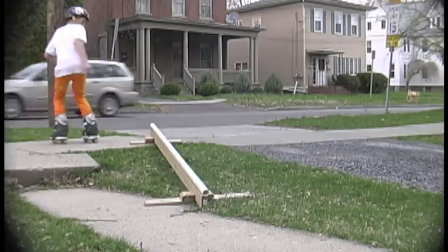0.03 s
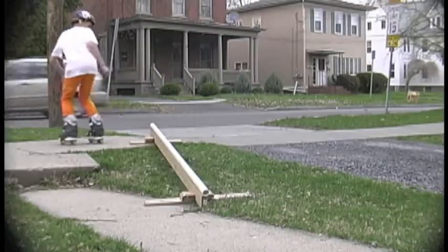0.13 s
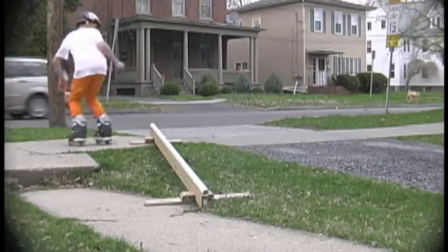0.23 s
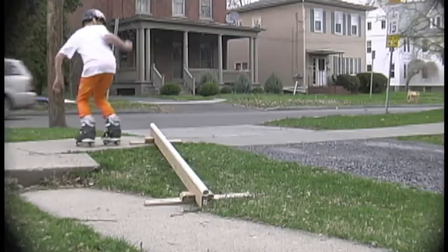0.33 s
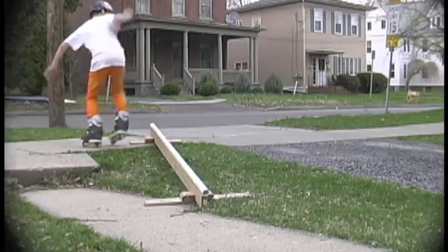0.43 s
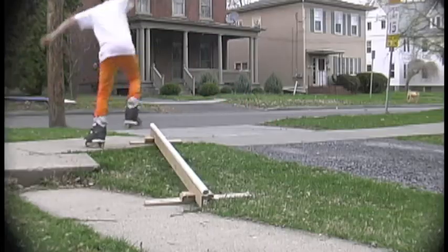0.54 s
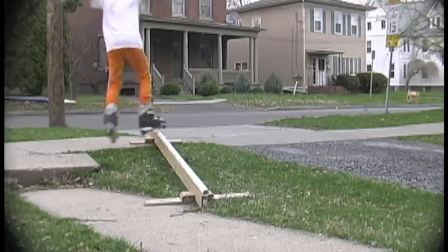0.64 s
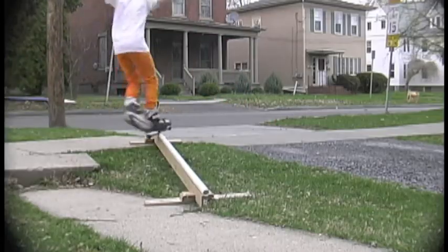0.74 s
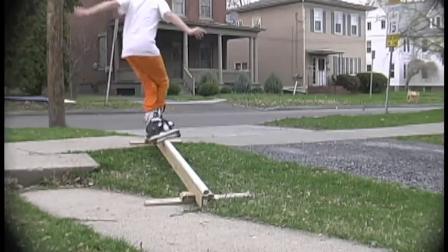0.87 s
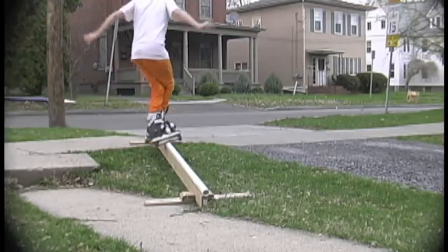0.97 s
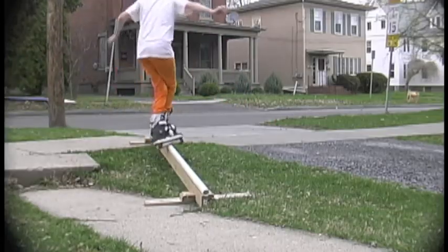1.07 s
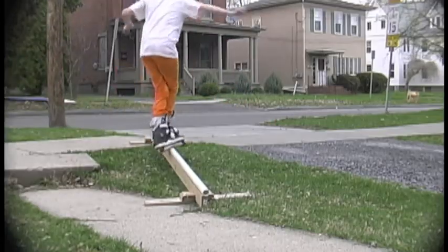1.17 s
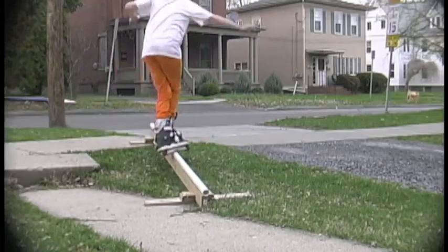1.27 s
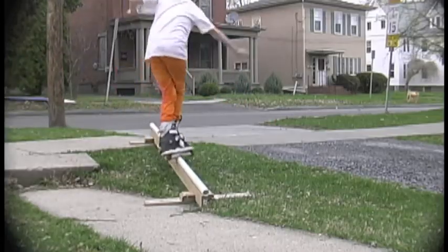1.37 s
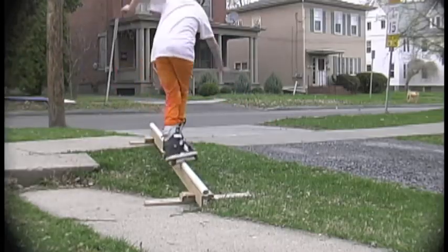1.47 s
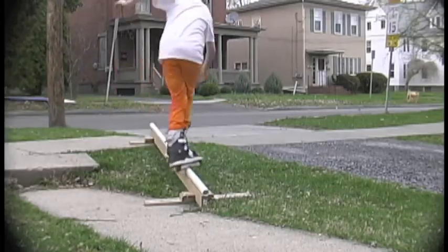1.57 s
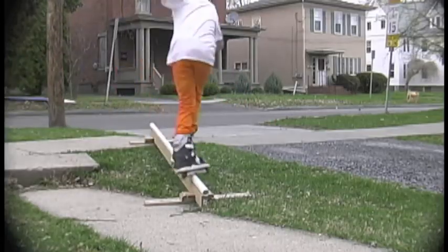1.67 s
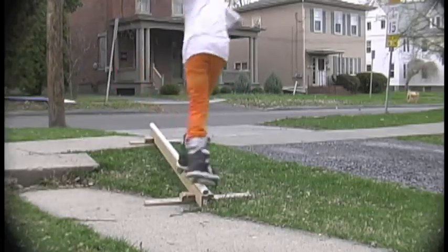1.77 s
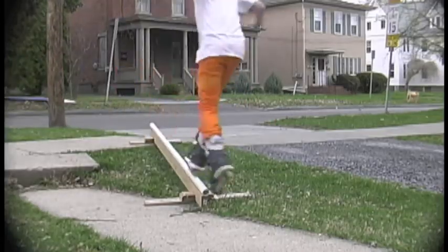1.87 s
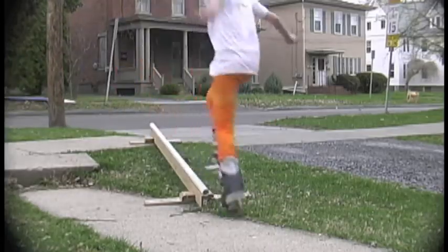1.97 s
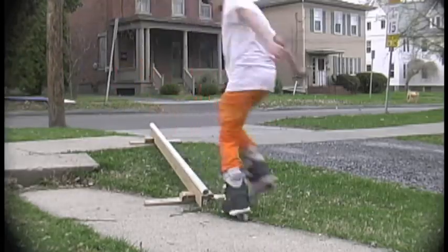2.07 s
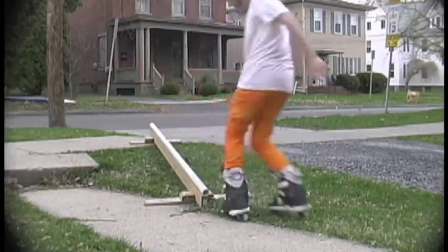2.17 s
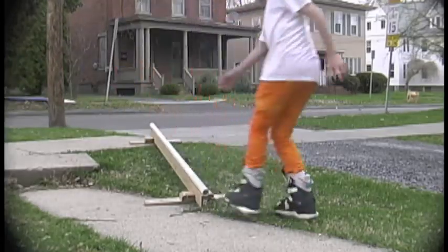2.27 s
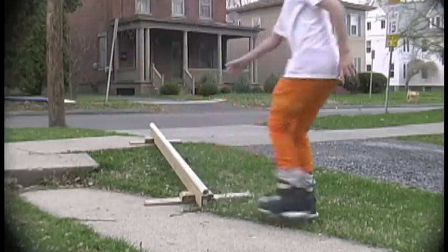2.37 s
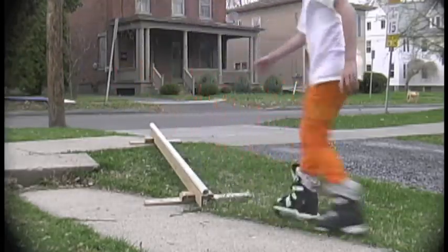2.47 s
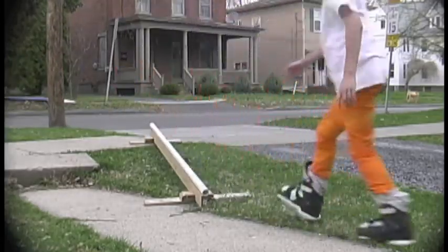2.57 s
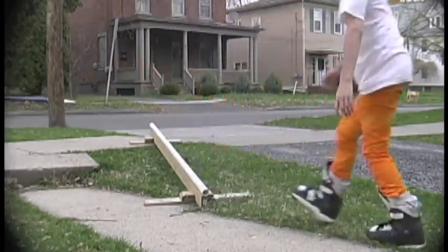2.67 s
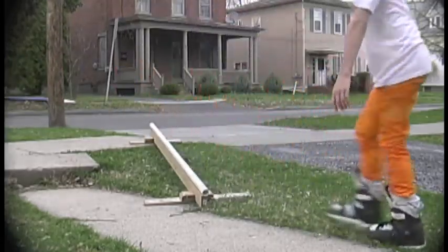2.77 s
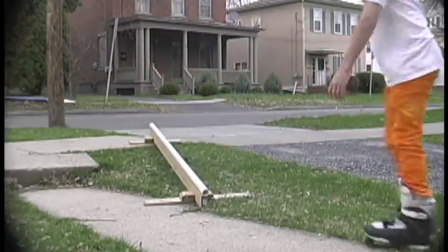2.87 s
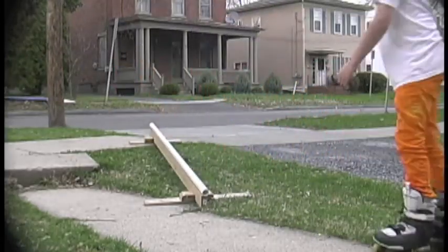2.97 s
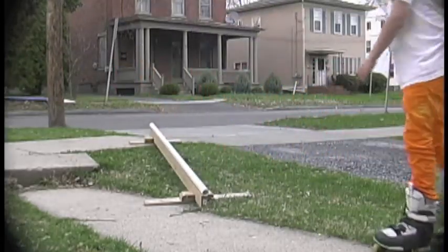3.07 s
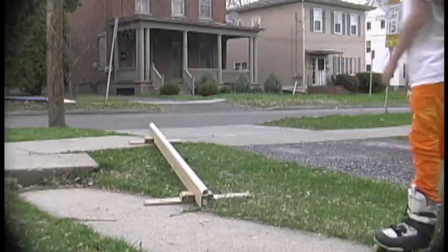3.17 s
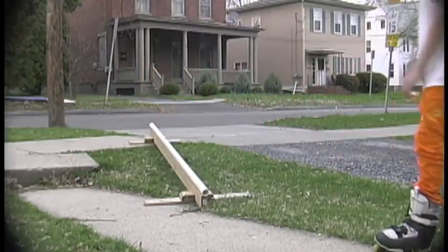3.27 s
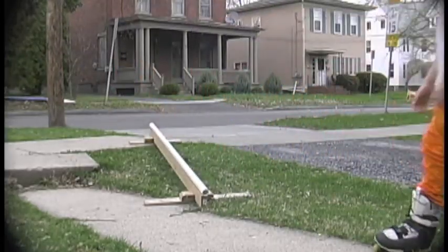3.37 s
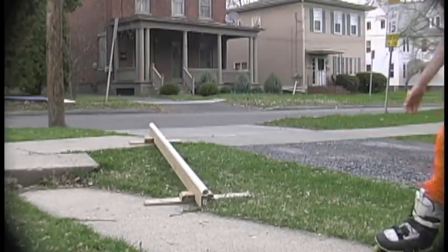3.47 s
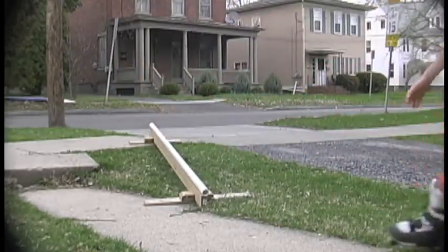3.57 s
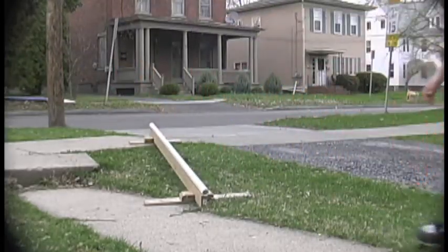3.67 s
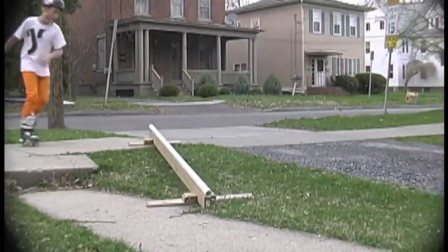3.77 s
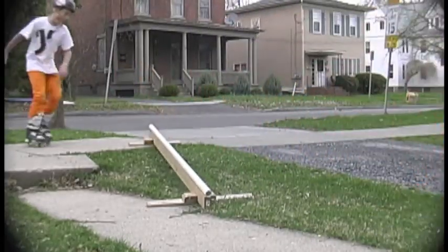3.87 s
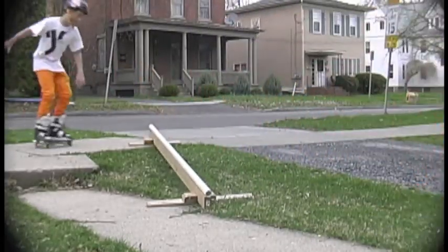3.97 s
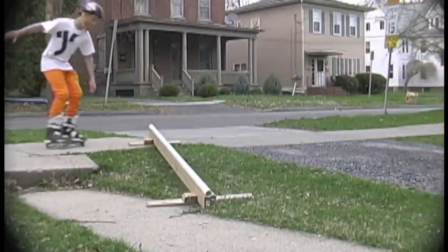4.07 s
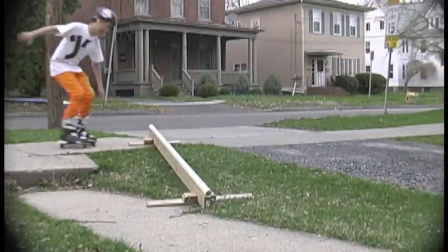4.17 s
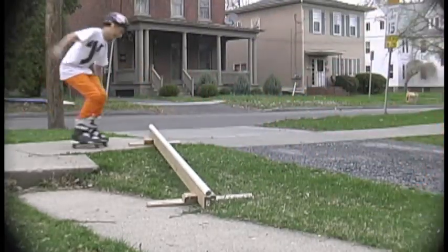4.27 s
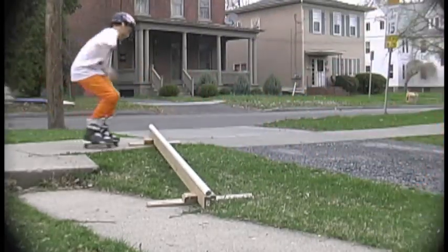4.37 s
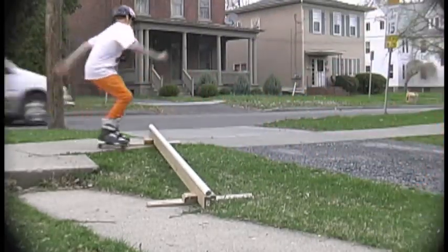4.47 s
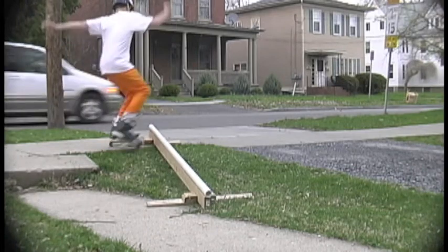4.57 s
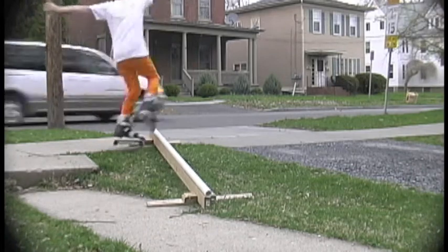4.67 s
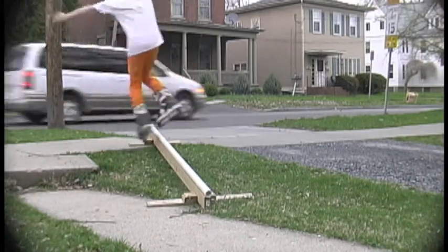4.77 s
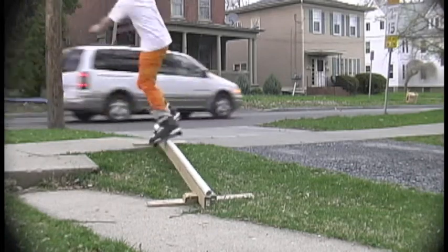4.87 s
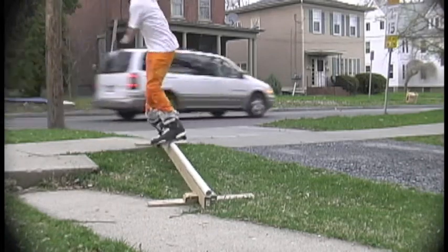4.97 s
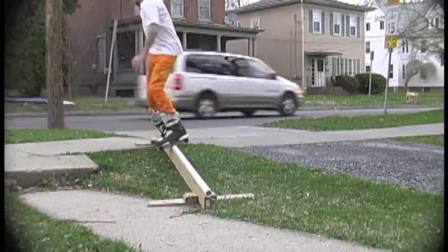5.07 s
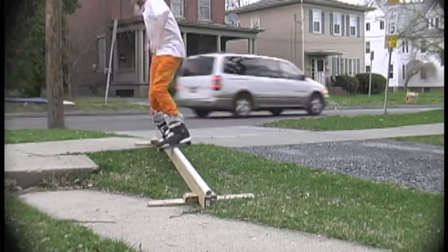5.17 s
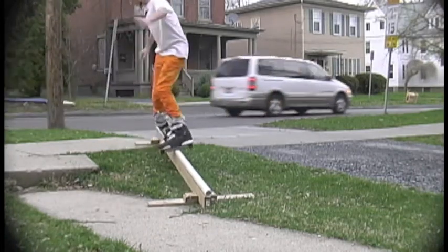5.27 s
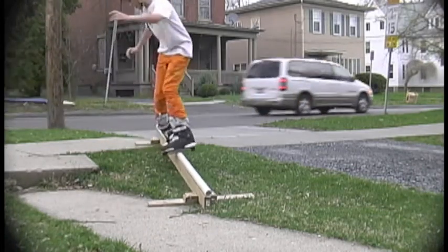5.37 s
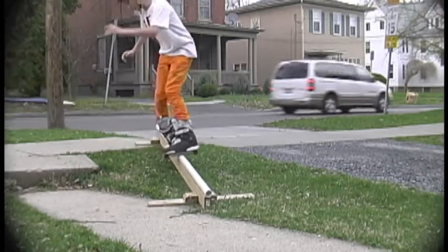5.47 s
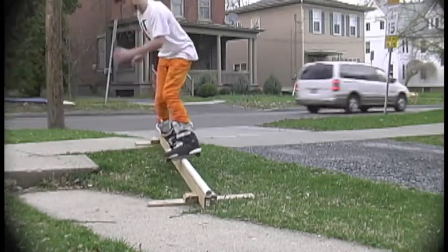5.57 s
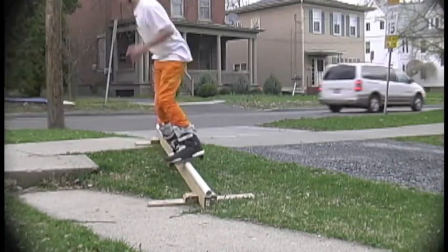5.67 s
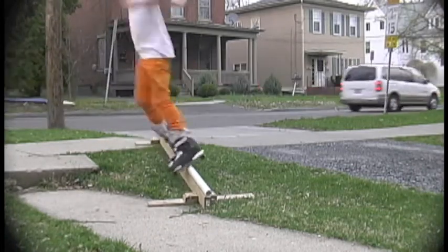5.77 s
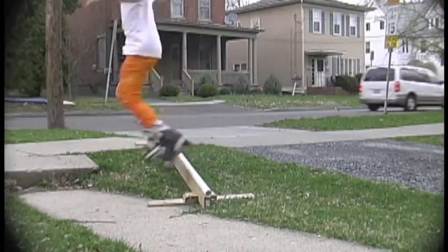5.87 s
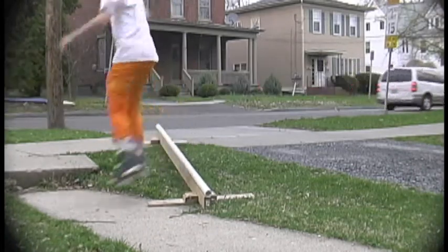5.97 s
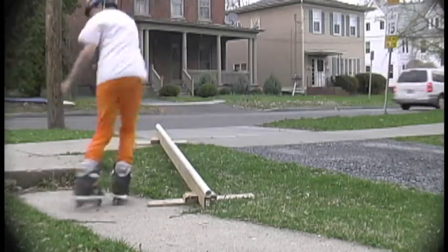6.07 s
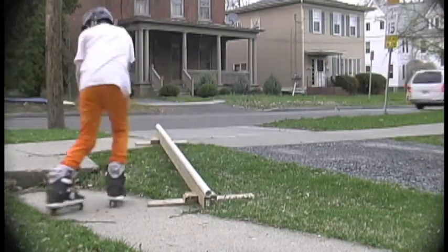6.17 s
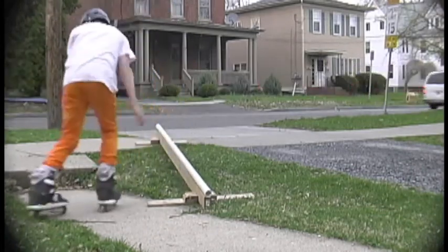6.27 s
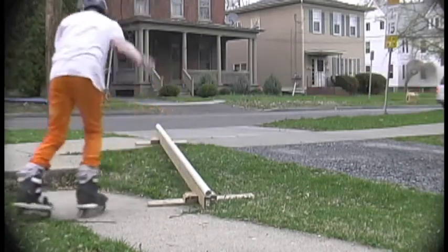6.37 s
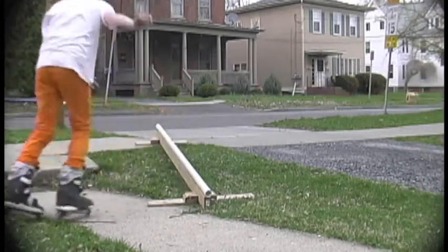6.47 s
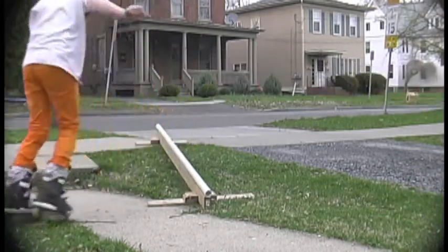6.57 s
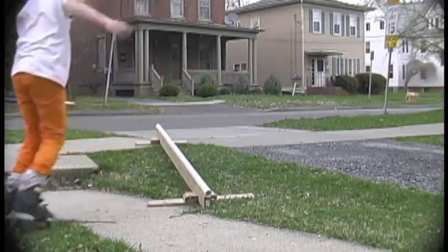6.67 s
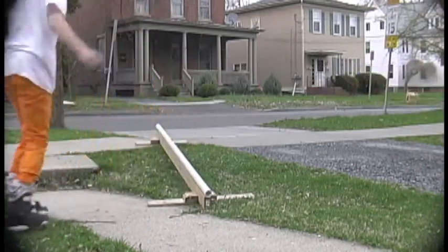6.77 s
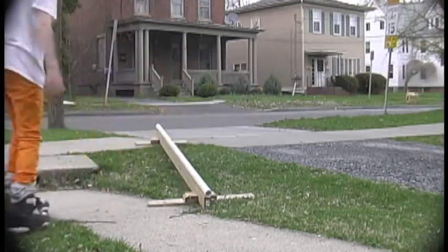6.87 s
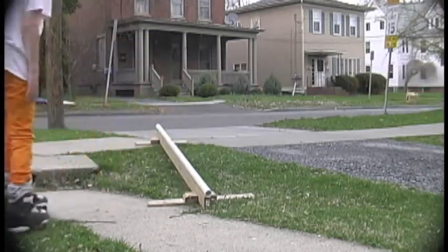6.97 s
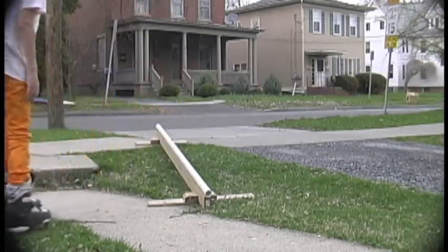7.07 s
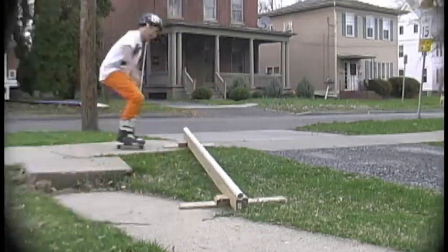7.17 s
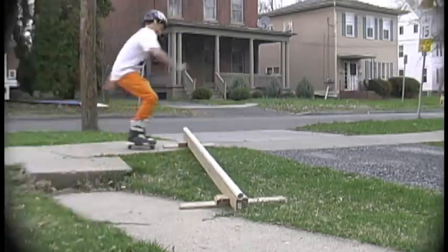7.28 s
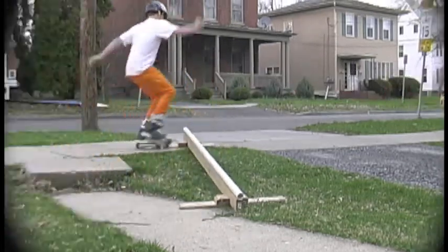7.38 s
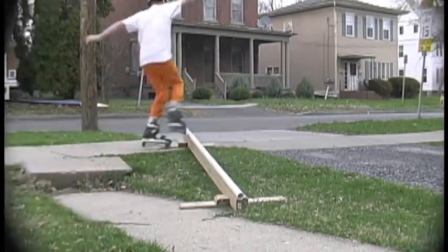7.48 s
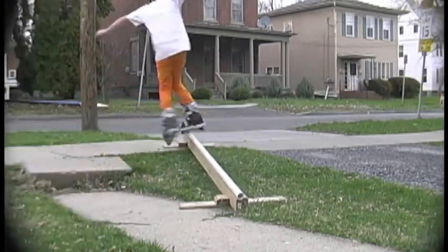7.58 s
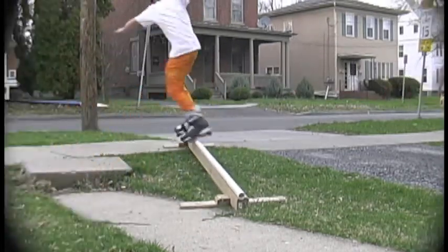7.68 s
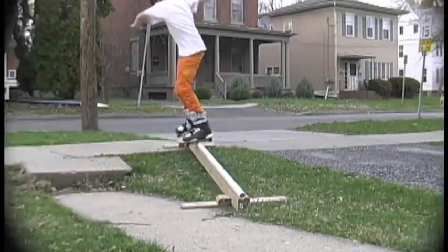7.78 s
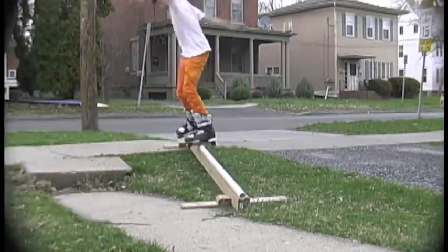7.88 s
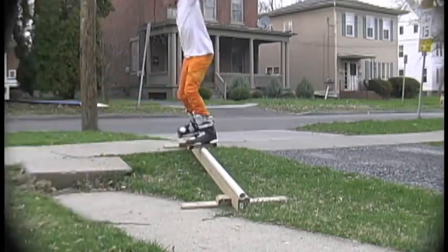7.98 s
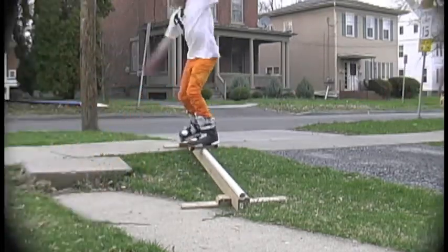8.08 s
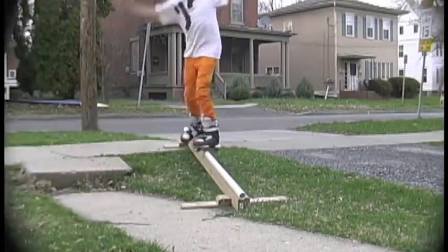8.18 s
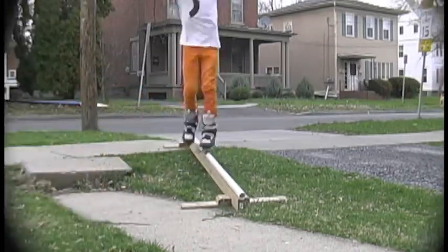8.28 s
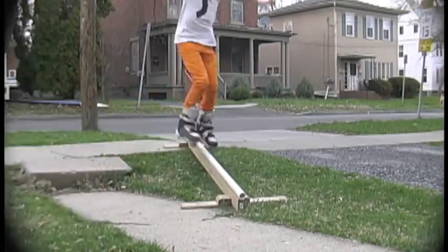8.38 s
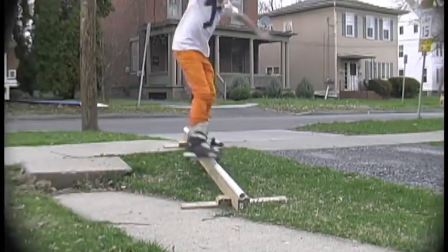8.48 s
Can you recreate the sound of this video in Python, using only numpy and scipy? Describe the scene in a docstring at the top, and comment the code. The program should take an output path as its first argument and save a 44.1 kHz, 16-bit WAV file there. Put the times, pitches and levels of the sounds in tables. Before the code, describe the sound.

Outdoors on a residential street, inline skates hit a wooden rail with sharp plastic and woody clacks, slide quietly, then land with a hard crack and gritty wheel roll. Three attempts are joined by brief dips in sound, the last ending on the rail. Low traffic rumble, tyre wash and faint chirping birds sit behind. Close stereo microphone.

```python
"""Inline skates knock, land on a wooden rail, grind along it and drop onto pavement in a residential street.
Each knock is a noise crack ringing plastic and wood modes, with a soft low thump and a short noise tail.
Wheels, grit and scuffs are grainy banded noise. Behind them lie traffic in banded noise, engine sines and
faint birds in swept sines. An opening snippet runs into three passages, with fades around each join."""
import sys
import numpy as np
from scipy import signal
from scipy.io import wavfile
from scipy.ndimage import uniform_filter1d

SR = 44100
rng = np.random.default_rng(int(sys.argv[2]) if len(sys.argv) > 2 else 0)


def generate_wav(sig):
    """Save sig (samples, or channels by samples) to the path in sys.argv[1] as 16-bit PCM at SR."""
    pcm = np.round(np.clip(np.atleast_2d(sig).T, -1, 1) * 32767).astype(np.int16)
    wavfile.write(sys.argv[1], SR, pcm)


def volts_from_decibels(level):
    """Turn decibel levels (scalar or array-like) into linear amplitude factors."""
    exponent = np.asarray(level, float) / 20
    return 10 ** exponent


N = 375732


def rms_one(x):
    """Scale to rms 1."""
    return x / np.sqrt(np.mean(x ** 2) + 1e-20)


def in_time(rows):
    """Draw each column of a timed table as a curve over every sample."""
    seconds, *columns = np.transpose(rows)
    return [np.interp(np.arange(N) / SR, seconds, column) for column in columns]


# Joins that open the three passages.
# Each row: time in seconds, fade out before it in seconds, fade in after it in seconds.
JOINS = [(0.068, 0.096, 0.069), (3.767, 0.11, 0.11), (7.241, 0.074, 0.1)]


def passage_number():
    """Passage (0 to 2) that each sample belongs to; the opening snippet counts with the first."""
    return np.searchsorted([join[0] for join in JOINS[1:]], np.arange(N) / SR)


def by_passage(tables):
    """Let each passage read its own curves, so values jump at the joins."""
    return [np.choose(passage_number(), column) for column in zip(*map(in_time, tables))]


def at_hz(points, hz):
    """Read a table at a frequency, on a log axis."""
    points = np.array(points)
    return np.interp(np.log(hz), np.log(points[:, 0]), points[:, 1])


def drift(rate_hz):
    """Slow random wander of rms 1: noise through two equal one-pole lowpasses."""
    pole = np.exp(-80 * np.pi * rate_hz / SR)   # runs at a fortieth of the sample rate
    slow = signal.lfilter([1], [1, -2 * pole, pole ** 2], rng.standard_normal(N // 40 + 2002))
    slow = rms_one(slow[2000:])
    return np.interp(np.arange(N) / 40, np.arange(len(slow)), slow)


def ring(force, hz, t60):
    """Damped resonance: a unit click rings a sine that starts at height 1; t60 is at least 3 ms."""
    decay = volts_from_decibels(-60 / (max(t60, .003) * SR))
    turn = 2 * np.pi * hz / SR
    return signal.lfilter([0, np.sin(turn)], [1, -2 * decay * np.cos(turn), decay ** 2], force + 1e-18)


def panned(pan_db):
    """Left and right gains; pan_db is left over right."""
    return volts_from_decibels(np.multiply.outer([.5, -.5], pan_db))


def banded(spectrum, likeness, patchy_db, grain_db=0., grains_per_s=3000.):
    """Stereo noise of rms 1 in flickering half-octave bands; random grains make it gritty."""
    white = rng.standard_normal((2, 2, N))
    grains = (rng.random(N) < grains_per_s / SR) * rng.exponential(1, N)
    grain_swell = np.minimum(uniform_filter1d(grains, size=20) * 8, 3)
    white = white * volts_from_decibels(grain_db * grain_swell)
    lowest, highest = spectrum[0][0], spectrum[-1][0]
    edges = lowest * 2 ** np.arange(0, np.log2(highest / lowest) + .5, .5)
    out, together = 0, drift(10.8)
    for k, (low, high) in enumerate(zip(edges, np.minimum(edges[1:], .45 * SR))):
        band = signal.butter(2, [low, high], "band", fs=SR, output="sos")
        mid, side = signal.sosfilt(band, white[k % 2])
        hz = np.sqrt(low * high)
        alike = np.clip(at_hz(likeness, hz), 0, .999)
        flicker_db = patchy_db * (0.79 * together + drift(18.0))
        gain = volts_from_decibels(at_hz(spectrum, hz) + flicker_db)
        out = out + gain * (np.sqrt(1 + alike) * mid + np.sqrt(1 - alike) * side * [[1], [-1]])
    return rms_one(out)


# Passing traffic, one list per passage.
# Each row: time in seconds, tyre roar in dB, low rumble in dB, tyre pan in dB (left over right).
PASSING = [
    [(0.16, -44, -0.5, 2.5), (1.0, -43.5, 2.5, 2.5), (1.9, -44, 0, 3.5), (2.7, -45, -5, 0),
     (2.95, -45, -4, -2), (3.62, -48.5, -6.5, 0.5)],
    [(3.9, -37, 3.5, 2), (4.5, -38.5, 3.5, 2.5), (5.0, -36.5, 0, 0.5), (5.35, -38.5, -4, -0.5),
     (5.9, -43, -5, -4), (6.35, -43, -4, 0.5), (6.7, -44, -4, -0.5), (7.1, -49, -12.5, -3.5)],
    [(7.38, -56, -3.5, 5), (7.7, -48.5, 0.5, 0.5), (8.52, -54, -1.5, -1)],
]
# Street bed where the low rumble column is 0, one row per passage.
# Each row: road rumble in dB, car-body boom in dB, hum in dB (moves with the boom), wind in dB, wind rise in dB/s.
STREET_BED = [(-40.5, -48, -49.5, -54, -1.5), (-40.5, -47.5, -45, -59.5, 3.5), (-38, -54, -65, -45, 8)]
# Noise colours. Each row: frequency in Hz, relative density in dB per Hz.
RUMBLE_COLOUR = [(26, -24), (45, -9.5), (92, -2), (260, -18.5), (340, -47), (570, -120)]
BOOM_COLOUR = [(100, -23), (170, -1), (226, -4), (280, 4.5), (492, -25.5), (560, -22), (730, -43),
               (1230, -120)]
WIND_COLOUR = [(18, 3.5), (32, -7), (60, -9.5), (100, -11)]
TYRE_COLOURS = [
    [(290, -51), (500, -5), (661, -10), (833, -2), (1350, 1), (1980, -7.5), (3890, -12.5), (5000, -6),
     (6500, -49), (11000, -120)],
    [(290, -2), (500, -7), (578, -21), (764, 6), (1020, -1.5), (1220, 2), (2400, -12.5), (5000, -10),
     (6500, -34), (11000, -120)],
    [(290, -42), (500, -7), (612, -12), (749, -5), (1020, -9), (1460, -8.5), (5000, -20.5), (6500, -23),
     (11000, -120)],
]   # one list per passage
# Stereo width of the tyre roar. Each row: frequency in Hz, left-right likeness (1 is mono).
TYRE_LIKENESS = [(60, 0.96), (150, 0.93), (380, 0.078), (950, 0.2), (2380, 0.4), (5980, 0.23),
                 (15000, 0.91)]
RUMBLE_FOLLOWS, BOOM_FOLLOWS = 0.64, 1.41   # dB for each dB of low rumble
HUM_HZ, HUM_WIDTH_HZ = 227.3, 14


def traffic():
    """Low road rumble, boom of car bodies, a narrow hum, the roar of tyres passing and light wind."""
    tyre_db, lows_db, pan_db = by_passage(PASSING)
    passage = passage_number()
    rumble_db, boom_db, hum_db, wind_db, wind_rise = np.transpose(STREET_BED)[:, passage]
    rumble = banded(RUMBLE_COLOUR, [(50, 1.0), (250, 0.79)], patchy_db=1.0)
    rumble = volts_from_decibels(rumble_db + RUMBLE_FOLLOWS * lows_db) * rumble
    boom = volts_from_decibels(boom_db) * banded(BOOM_COLOUR, [(200, 1.0), (500, 0.78)], patchy_db=1.0)
    hum_t60 = np.log(1000) / (np.pi * HUM_WIDTH_HZ)
    boom += volts_from_decibels(hum_db) * rms_one(ring(rng.standard_normal(N), HUM_HZ, hum_t60))
    since_join = np.arange(N) / SR - np.transpose(JOINS)[0][passage]
    wind_db = wind_db + wind_rise * since_join + 2.0 * drift(4.1)
    wind = volts_from_decibels(wind_db) * banded(WIND_COLOUR, [(20, 0.57), (100, 0.27)], patchy_db=3.0)
    tyres = [banded(colour, TYRE_LIKENESS, patchy_db=1.04) for colour in TYRE_COLOURS]
    tyres = volts_from_decibels(tyre_db) * panned(pan_db) * np.choose(passage, tyres)
    return rumble + volts_from_decibels(BOOM_FOLLOWS * lows_db) * boom + wind + tyres


# Motor note of the opening snippet, dying away with its fade. Each row: frequency in Hz, peak level in dB.
MOTOR_NOTE = [(80, -16.5), (167, -24.5)]
# Levels are rms at time zero.
IDLE_HZ, IDLE_DB, IDLE_FADE_DB_PER_S = 41, -38.5, 1.5
DRONE_HZ, DRONE_DB, DRONE_RISE_DB_PER_S = 62.8, -51, 2.0
# The idle swells and sinks, less and less: period, first crest, depth, time constant.
THROB_S, THROB_TOP_S, THROB_DEPTH, THROB_DIES_S = .93, 0.36, 0.99, 1.7


def engines():
    """Sines: an idling firing tone under a drone in the first passage, a motor note before it."""
    t = np.arange(N) / SR
    throb_depth = THROB_DEPTH * np.exp(-t / THROB_DIES_S)
    throb = 1 + throb_depth * np.cos(2 * np.pi * (t - THROB_TOP_S) / THROB_S)
    idle_db = IDLE_DB - IDLE_FADE_DB_PER_S * t + 0.57 * drift(3)
    idle = throb * volts_from_decibels(idle_db) * np.sin(2 * np.pi * IDLE_HZ * t)
    drone_db = DRONE_DB + DRONE_RISE_DB_PER_S * t + .9 * drift(5.2)
    drone = volts_from_decibels(drone_db) * np.sin(2 * np.pi * np.cumsum(DRONE_HZ + 0.93 * drift(2.54)) / SR)
    opening = sum(volts_from_decibels(db) * np.sin(2 * np.pi * (hz * t + rng.random())) for hz, db in MOTOR_NOTE)
    first_join, second_join = JOINS[0][0], JOINS[1][0]
    running = (t > first_join) * (t < second_join)
    return np.sqrt(2) * (idle + drone) * running + opening * (t < first_join)


# Far chirps.
# Each row: start in seconds, length in seconds, first Hz, last Hz, level in dB before the bird mix.
CHIRPS = [(0.23, 0.025, 4800, 5120, -41), (0.888, 0.022, 3200, 3450, -39),
          (1.319, 0.025, 4700, 5000, -45.5), (1.421, 0.031, 4800, 5160, -45.5),
          (2.745, 0.06, 4550, 3930, -47), (3.323, 0.043, 4700, 5030, -50), (3.36, 0.042, 3870, 4530, -48),
          (3.976, 0.033, 3900, 4600, -39.5), (4.582, 0.039, 4960, 5100, -38),
          (5.849, 0.057, 4560, 3790, -45), (5.917, 0.036, 3600, 2800, -45), (6.508, 0.018, 4950, 4930, -42),
          (7.3, 0.074, 3470, 3450, -51.5), (7.471, 0.012, 5180, 4970, -42),
          (7.67, 0.036, 4400, 5300, -43.5), (8.125, 0.06, 4700, 4500, -55), (8.195, 0.034, 3520, 3570, -60)]
# Bouts of twitter from a flock.
# Each row: middle in seconds, half length in seconds, level in dB before the bird mix.
TWITTER = [(.25, 0.24, -52), (2.8, .07, -57), (3.383, .06, -53.5), (3.513, .08, -59), (4.2, .4, -61.5),
           (6.45, 0.26, -61.5), (7.5, 0.4, -57)]


def birds():
    """Quick raspy sine sweeps over a flock's twitter, blurred by echoes off the houses."""
    out, rasp_hz = np.zeros(N + SR), 135. * drift(120)
    for start_s, length, from_hz, to_hz, db in CHIRPS:
        part, start = np.linspace(0, 1, int(length * SR)), int(start_s * SR)
        during = slice(start, start + len(part))
        hz = from_hz + (to_hz - from_hz) * part + rasp_hz[during]
        out[during] += volts_from_decibels(db) * np.sin(np.pi * part) * np.sin(2 * np.pi * np.cumsum(hz) / SR)
    out, t = out[:N], np.arange(N) / SR
    flock = sum(volts_from_decibels(db) * np.exp(-((t - middle) / half) ** 2) for middle, half, db in TWITTER)
    for voice_hz in (3450, 4300, 4700, 5100):
        singing = np.clip(drift(35), 0, 1.5)
        hz = voice_hz + 300. * drift(40) + rasp_hz
        out = out + flock * singing * np.sin(2 * np.pi * np.cumsum(hz) / SR)
    lag = np.arange(SR // 4)
    echoes = rng.standard_normal((2, len(lag))) * volts_from_decibels(-25 - 60 * lag / (.3 * SR))   # 60 dB in 0.3 s
    return .7 * out + signal.fftconvolve(out[None], echoes, axes=1)[:, :N]


# Times on the rail. Each row: start in seconds, end in seconds.
RAIL_TIMES = [(.74, 2.0), (4.89, 5.98), (7.65, 8.52)]


def on_rail(s):
    """True while the skater is on the rail."""
    return np.searchsorted(np.ravel(RAIL_TIMES), s) % 2 == 1


# Ringing of boot shell and frame; decays under 3 ms are held at 3 ms.
# Each row: frequency in Hz, level in dB re the knock, t60 in seconds. Pebbles borrow only the frequencies.
BOOT_MODES = [(1870, -20, 0.015), (2406, -12.5, 0.012), (2800, -16, 0.0071), (3450, -1, 0.0058),
              (4220, 4, 0.0034), (4800, -10.5, 0.0077), (5420, 4.5, 0.0027), (6440, 5.5, 0.0023),
              (7580, 4, 0.0047), (8600, -1.5, 0.0067), (9700, -36.5, 0.0047), (13300, -10, 0.0049)]


def pebbles(level_db, per_s):
    """Specks of grit under the wheels tick one boot mode each, in step with the rolling."""
    size = volts_from_decibels(5 * np.minimum(rng.exponential(1, N), 2))
    clicks = (rng.random(N) < per_s / SR) * size
    dealt = rng.integers(1, len(BOOT_MODES) - 2, N)
    ticks = sum(ring(clicks * (dealt == k), hz, 22 / hz) for k, (hz, _, _) in enumerate(BOOT_MODES))
    return volts_from_decibels(level_db) * ticks


# Wheels and soles rubbing, one list per passage. Each row: time in seconds, rolling level in dB.
ROLLING_LEVEL = [
    [(0.16, -43), (0.44, -48), (0.6, -55.5), (0.8, -52.5), (1.3, -53), (1.78, -51.5), (2.09, -44),
     (2.17, -40), (2.45, -53), (2.72, -49.5), (3.2, -55.5), (3.45, -54), (3.65, -53.5)],
    [(3.85, -51.5), (4.45, -48), (4.63, -43), (4.9, -47.5), (5.05, -40), (5.44, -49), (5.65, -53),
     (6.07, -57.5), (6.2, -38.5), (6.7, -45), (6.86, -60), (7.1, -61.5)],
    [(7.3, -47.5), (7.6, -49), (7.7, -63), (7.8, -42), (7.93, -56.5), (8.13, -62), (8.21, -50), (8.36, -64)],
]
# Wheels dragged sideways.
# Each row: start in seconds, end in seconds, level in dB at the start, level in dB at the end.
SIDE_SCUFFS = [(2.504, 2.575, -35.5, -38), (2.562, 2.705, -33.5, -43.5), (2.85, 2.997, -44, -43),
               (5.785, 5.872, -50, -41), (8.18, 8.254, -50, -43)]
# Noise colours. Each row: frequency in Hz, relative density in dB per Hz.
ROLLING_COLOUR = [(1060, -16), (1800, -2), (2830, -3), (3190, -0.5), (5010, -6), (5730, 3), (9000, -12.5),
                  (11700, -44), (19800, -120)]
GRIT_COLOUR = [(2940, -57), (5000, 7), (7270, -20), (8120, 4), (11500, 0.5), (15100, -9), (16300, -22),
               (16500, -65)]
SCUFF_COLOUR = [(530, -38), (900, -18), (1220, -5), (2120, -1.5), (2500, -11.5), (3640, -5), (8050, -10),
                (13400, -20), (16000, -15)]
GRIT_DB, GRIT_RAIL_DB = -7.5, -11.5   # grit re rolling, on concrete and on the smoother rail


def skates():
    """Wheels over rough concrete and soles over wood: grainy noise, finer grit on top, sideways scuffs."""
    rolling_db, = by_passage(ROLLING_LEVEL)
    t, drag = np.arange(N) / SR, np.zeros(N)
    grit_db = rolling_db + np.where(on_rail(t), GRIT_RAIL_DB, GRIT_DB)
    rolling = banded(ROLLING_COLOUR, [(2000, .7), (9000, .8)], patchy_db=2.5, grain_db=5.5, grains_per_s=400.)
    grit = banded(GRIT_COLOUR, [(5000, .7), (16000, .5)], patchy_db=1.5, grain_db=3.0, grains_per_s=400.)
    ticks = pebbles(rolling_db, per_s=140)
    for start, end, start_db, end_db in SIDE_SCUFFS:
        edge = np.clip(np.minimum((t - start) / .008, (end - t) / 0.027), 0, 1)
        drag += edge * volts_from_decibels(np.interp(t, [start, end], [start_db, end_db]))
    scuff = banded(SCUFF_COLOUR, [(1000, .7), (16000, .7)], patchy_db=2.0, grain_db=5.0, grains_per_s=500.)
    return volts_from_decibels(rolling_db) * rolling + volts_from_decibels(grit_db) * grit + drag * scuff + ticks


# Knocks. Each row: time in seconds, strength in dB, favoured frequency in Hz, tail in dB re strength.
BLOWS = [(0.0775, -2.5, 3660, -31.5), (0.1394, -25, 3200, -18), (0.5167, -22.5, 3030, -19),
         (0.568, -31, 5020, -23), (0.634, -30.5, 5300, -33), (0.7458, -16.5, 2310, -21.5),
         (0.7661, -9, 3400, -20.5), (0.778, -23, 3000, -24), (0.9067, -10, 5300, -10),
         (0.9169, -10.5, 2860, -35), (0.9376, -21, 2810, -32), (0.967, -17, 2810, -25),
         (0.991, -28, 2830, -24), (1.02, -27.5, 2830, -15), (1.465, -25.5, 4670, -26),
         (1.8166, -32, 4300, -15), (1.8893, -23, 4300, -22), (1.9379, -24.5, 5400, -14),
         (2.025, -13.5, 2780, -28), (2.0858, 1.5, 4000, -28), (2.0961, -9.5, 4130, -18.5),
         (2.154, -21, 7000, -30), (2.1612, -22, 7370, -39), (2.1904, -26, 4040, -24),
         (2.1960, -14.5, 4000, -26), (2.208, -20, 1740, -15), (2.985, -16.5, 5870, -16),
         (2.9914, -5, 2030, -41), (4.058, -11, 3360, -22.5), (4.0734, -8.5, 2600, -25),
         (4.207, -13, 2950, -26), (4.5152, -25, 3300, -24), (4.5547, -10.5, 5150, -20),
         (4.8977, -1, 6050, -18.5), (4.93, -10.5, 1630, -13.5), (5.0135, -11.5, 5500, -18),
         (5.0198, -5, 4080, -22), (5.0426, -6.5, 2500, -21.5), (5.1155, -18.5, 3440, -18),
         (5.967, -27, 3800, -19), (6.0899, -1.5, 5100, -23.5), (6.1068, 1, 5070, -21),
         (6.1275, -1.5, 5070, -20.5), (6.2038, -6, 3070, -31), (6.648, -24, 3200, -20),
         (6.7174, -21.5, 3130, -30), (6.8008, -32, 4240, -22), (6.88, -33, 5000, -30),
         (7.08, -28, 6360, -24), (7.367, -32, 8000, -14), (7.444, -28.5, 5200, -31), (7.52, -30, 3080, -15),
         (7.595, -35, 5230, -20), (7.659, -19, 4870, -20), (7.7263, -16, 2260, -27),
         (7.735, -0.5, 5640, -16.5), (8.2796, -32.5, 5000, -13), (8.3482, -36, 4690, -28),
         (8.3688, -11, 2580, -28), (8.4085, -30, 2500, -16), (8.4883, -6, 2600, -25)]
# Blows with a stronger low thump. Each row: time in seconds, thump in dB re strength.
DEEP_THUMPS = [(.9166, -14), (.9376, -10), (2.0858, -17.5), (4.931, -10), (6.0901, -16.5), (6.1278, -13),
               (7.735, -18.5)]
# Wooden rail, then ground and rail taking the weight.
# Each row: frequency in Hz, level in dB re the wood or thump level, t60 in seconds.
WOOD_MODES = [(340, -11.5, 0.078), (460, -16.5, 0.056), (631, -23, 0.25), (758, -12, 0.047),
              (975, -6, 0.032), (1242, -11, 0.052)]
THUMP_MODES = [(108.3, -6.5, 0.22), (161, 3, 0.045), (231.5, -5, 0.093), (375, -4.5, 0.023)]
# Street answer to a knock. Each row: frequency in Hz, relative density in dB per Hz.
TAIL_COLOUR = [(590, -18), (1000, -2), (2080, -1.5), (2590, -1.5), (3670, -2), (5630, -2.5), (12700, -20),
               (15100, -38), (16000, -55.5)]
LOCK_S = .3   # after mounting the rail the blows go straight into the wood
WOOD_LOCK_DB, WOOD_RAIL_DB, WOOD_GROUND_DB = -11.5, -22, -33   # re strength: locking on, sliding, off rail
THUMP_STEP_DB = -26.5   # thump re strength of the other blows
CRACK_S, RATTLE_S = 0.00086, 0.005   # time constants of a blow at 0 dB or above
TAIL_T60_S = .17


def knocks():
    """Each blow is a ragged crack into boot and rail, a later thump in the ground and a dying tail."""
    s, strength_db, centre_hz, tail_db = np.transpose(BLOWS)
    rail_db = np.where(on_rail(s - LOCK_S), WOOD_RAIL_DB, WOOD_LOCK_DB)
    wood_db = np.where(on_rail(s), rail_db, WOOD_GROUND_DB)
    thump_db = np.full(len(s), float(THUMP_STEP_DB))
    for deep_s, db in DEEP_THUMPS:
        thump_db[np.argmin(np.abs(s - deep_s))] = db
    at, lag = np.round(s * SR).astype(int), np.arange(400)
    chance = rng.standard_normal((len(s), len(BOOT_MODES) + len(WOOD_MODES) + len(THUMP_MODES)))

    noise = rng.standard_normal((3, len(s), 400))
    noise = noise[0] + 0.51 * noise[1:]   # each ear gets slightly different reflections
    lag = lag / np.clip(1 - strength_db / 37.0, 1, 3)[:, None]   # weak blows stay in contact longer
    shape = np.exp(-lag / (CRACK_S * SR)) + 0.15 * np.exp(-lag / (RATTLE_S * SR))
    crack = noise * shape * np.minimum(lag / 31.5, 1)
    crack = crack / np.sqrt(np.sum(crack ** 2, axis=2, keepdims=True))
    crack[..., 24] += .22   # a single click inside the ragged crack

    out, during = np.zeros((2, N + 999)), at[:, None] + np.arange(400)
    for k, (hz, db, t60) in enumerate(BOOT_MODES + WOOD_MODES):
        octaves_away = np.abs(np.log2(hz / centre_hz))
        # the spot struck favours modes near its pitch
        near_db = 9 * np.exp(-(octaves_away / .22) ** 2) - 6 * octaves_away - 10
        material_db = near_db if k < len(BOOT_MODES) else wood_db
        mode_db = strength_db + db + material_db + 2. * chance[:, k]
        force = np.zeros((2, N + 999))
        for ear in range(2):
            np.add.at(force[ear], during, volts_from_decibels(mode_db)[:, None] * crack[ear])
        out += ring(force, hz, t60)

    push = np.hanning(120) / 60   # the weight arrives softly, a little after the crack
    for k, (hz, db, t60) in enumerate(THUMP_MODES):
        force = np.zeros(N + 999)
        force[at + 60] = volts_from_decibels(strength_db + thump_db + db + 0.64 * chance[:, -1 - k])
        out += ring(np.convolve(force, push)[:N + 999], hz, t60)

    power = np.zeros(N + 999)
    power[at + 90] = volts_from_decibels(2 * (strength_db + tail_db))
    fall = volts_from_decibels(-2 * 60 / (TAIL_T60_S * SR))
    envelope = np.sqrt(signal.lfilter([1], [1, -fall], power + 1e-18))[:N]
    tail = banded(TAIL_COLOUR, [(500, .6), (9000, .8)], patchy_db=3.0, grain_db=5.0, grains_per_s=450.)
    return out[:, :N] + envelope * tail


# Skater's place in the stereo field. Each row: time in seconds, pan in dB (left over right).
SKATER_PLACE = [(0.16, 0), (1.9, 0.5), (2.4, -1.5), (3.0, -1.5), (3.7, 1), (3.85, 1.5), (4.9, -0.5),
                (6.1, 0.5), (6.7, 0.5), (7.1, 2), (7.4, 0), (7.75, -1.5), (8.5, 1)]


def scene():
    """All sources in the street; the skater moves across the stereo field."""
    skater = panned(in_time(SKATER_PLACE)[0]) * (skates() + knocks())
    return traffic() + engines() + birds() + skater


def band_limit(x):
    """A steep low-pass at the top of the band."""
    return signal.sosfilt(signal.butter(12, 16650, fs=SR, output="sos"), x)


def record(dry):
    """Fade around each join to a floor of -40 dB, round the peaks and cut the top."""
    t, fade = np.arange(N) / SR, np.ones(N)
    for join_s, out_s, in_s in JOINS:
        fade *= np.clip(np.maximum((join_s - t) / out_s, (t - join_s) / in_s), .01, 1)
    rounded = .9 * np.tanh(dry * fade / .9)
    top_cut = signal.cheby2(10, 50, 16600, fs=SR, output="sos")   # 50 dB down from 16.6 kHz
    return band_limit(signal.sosfilt(top_cut, rounded))


dry = scene()
out = record(dry)
generate_wav(out)
```